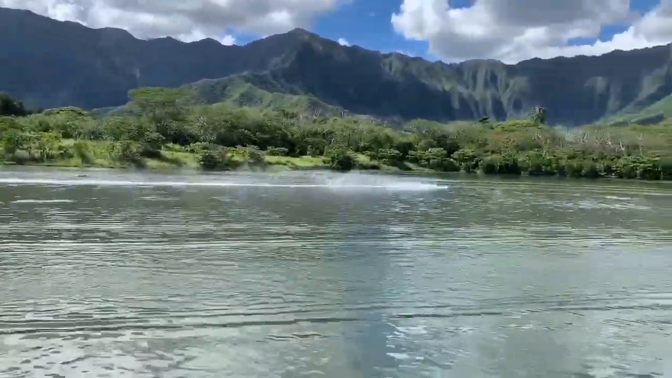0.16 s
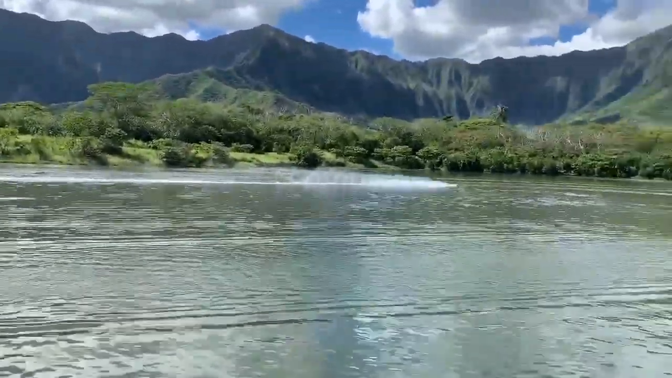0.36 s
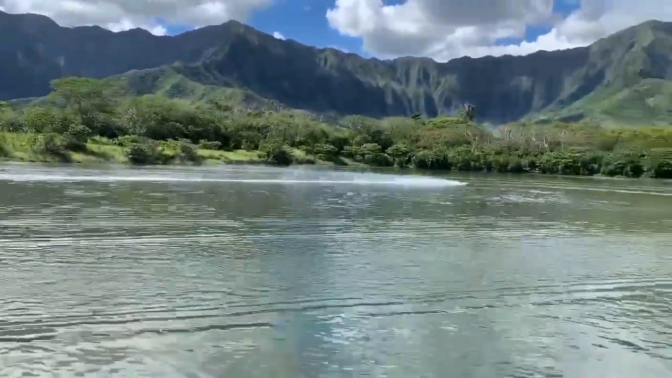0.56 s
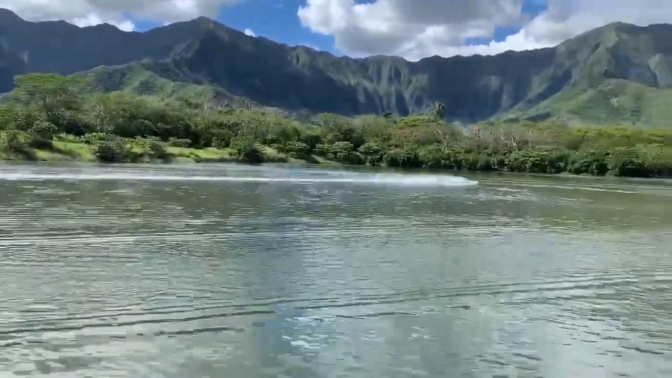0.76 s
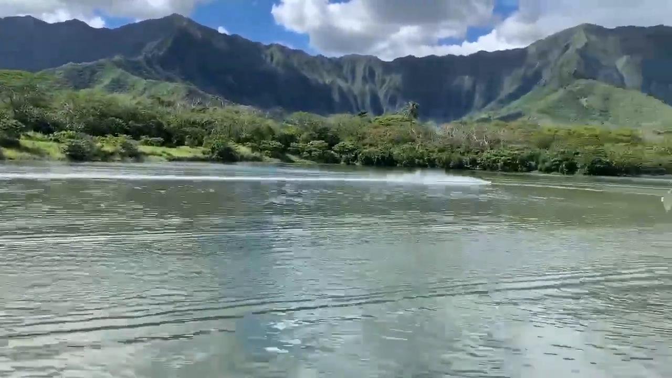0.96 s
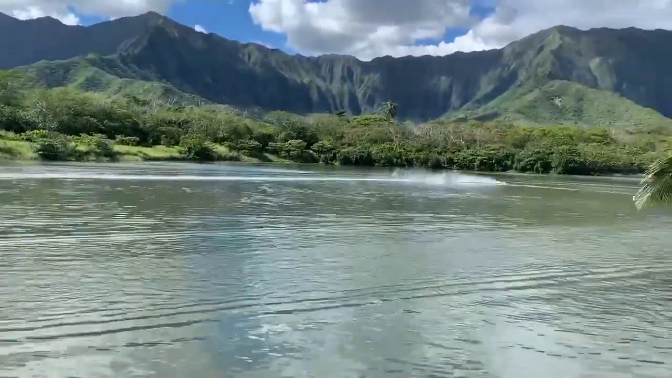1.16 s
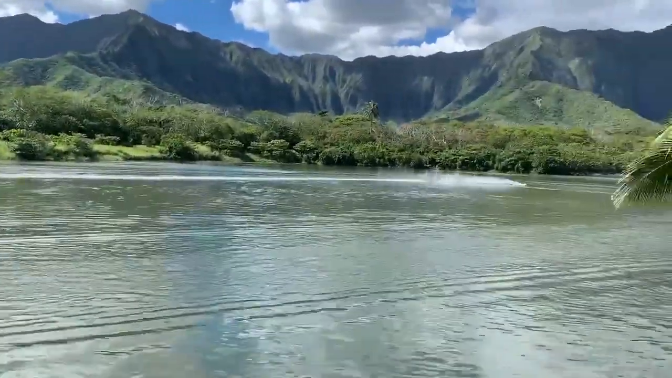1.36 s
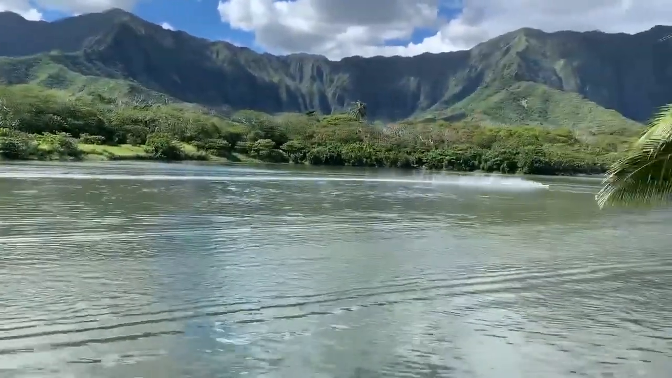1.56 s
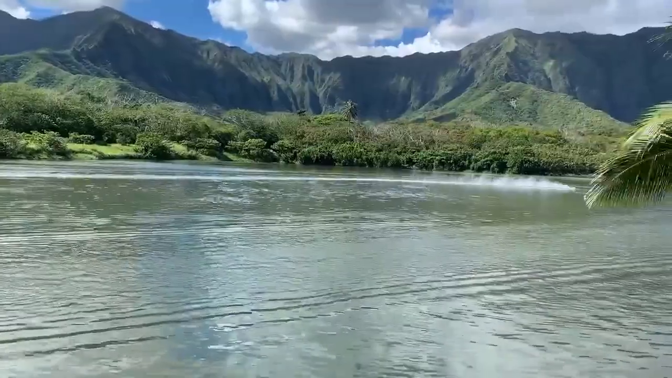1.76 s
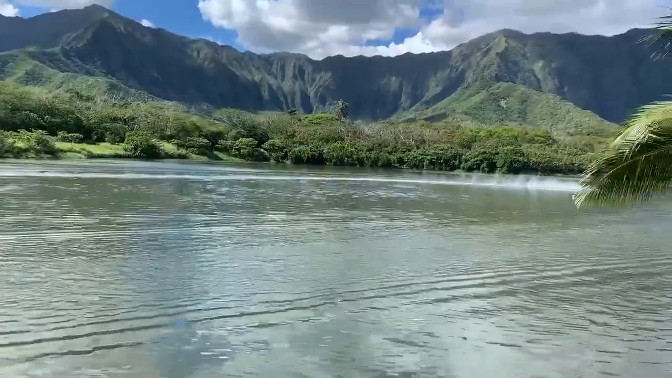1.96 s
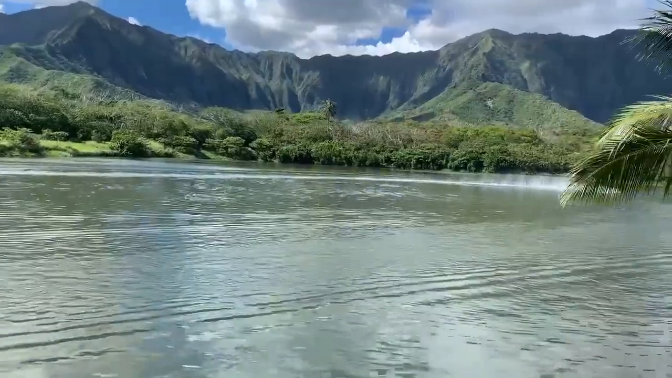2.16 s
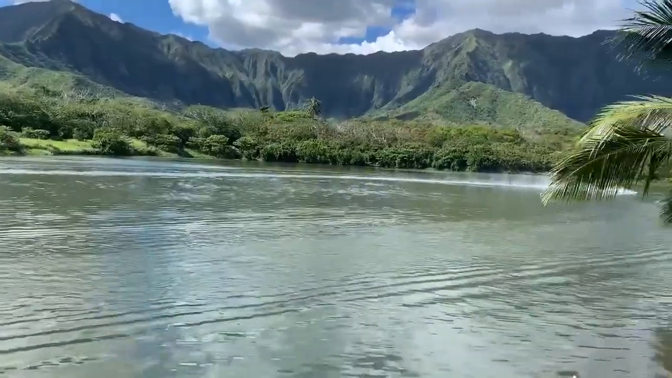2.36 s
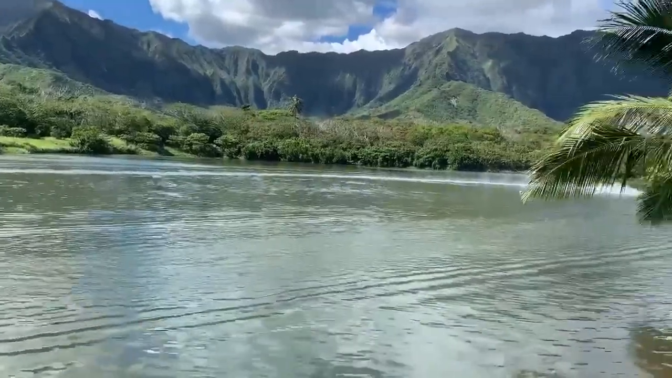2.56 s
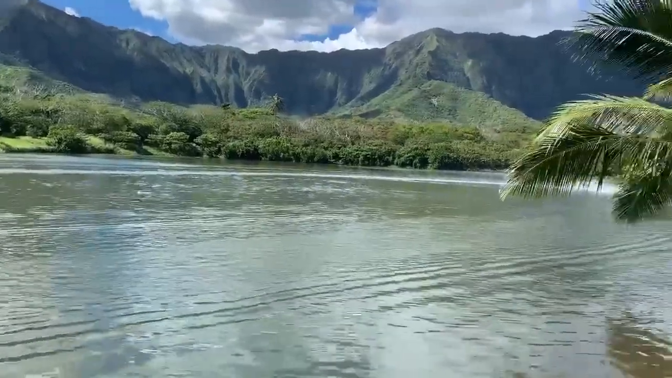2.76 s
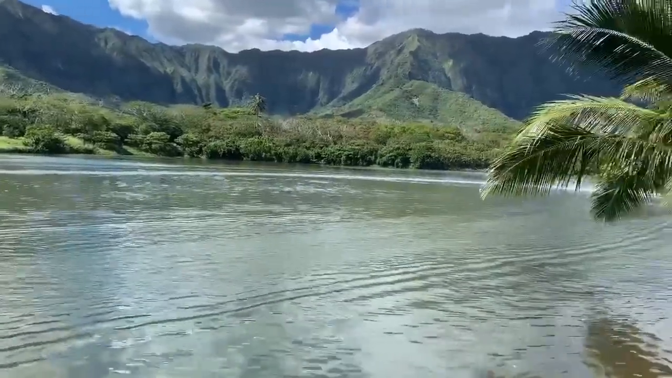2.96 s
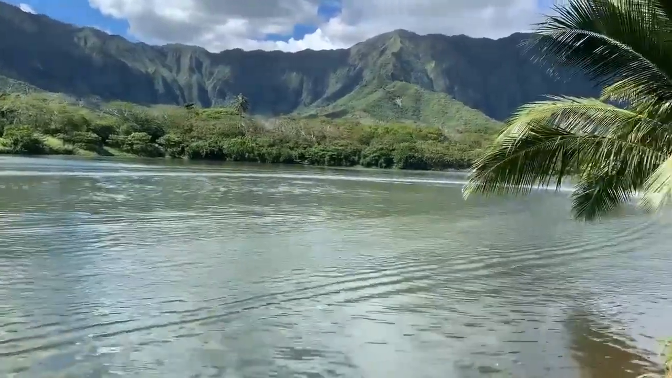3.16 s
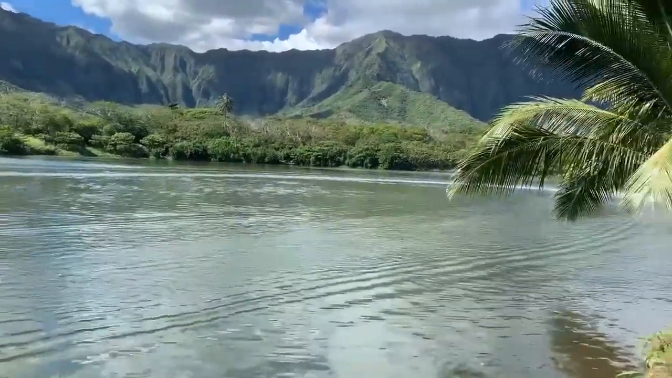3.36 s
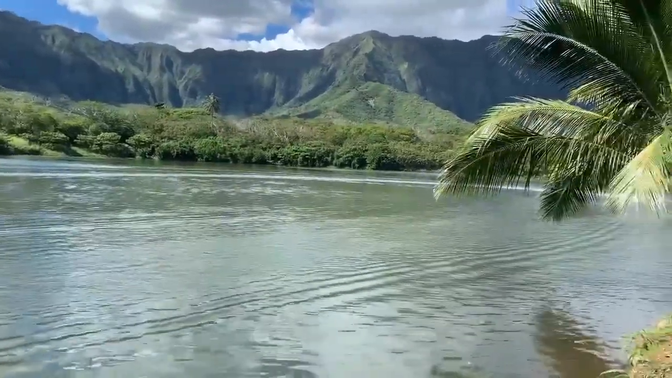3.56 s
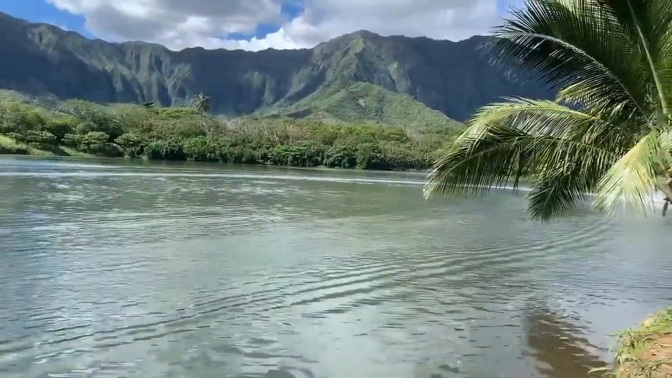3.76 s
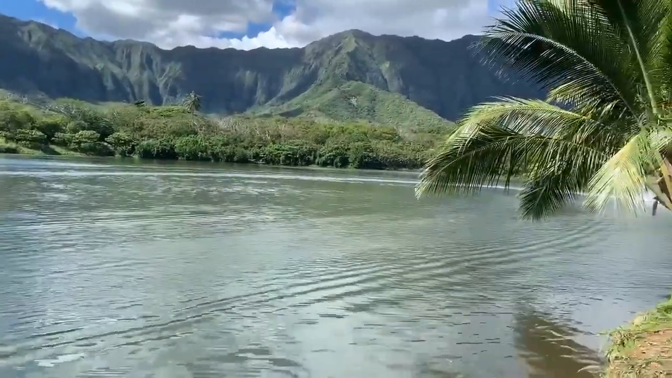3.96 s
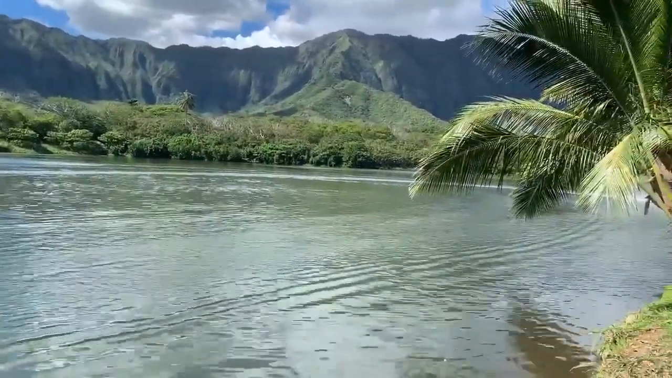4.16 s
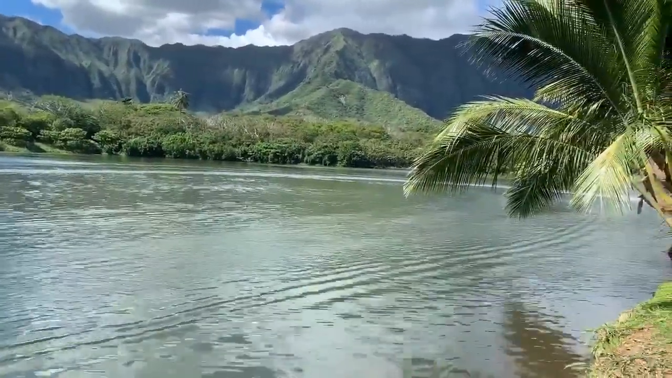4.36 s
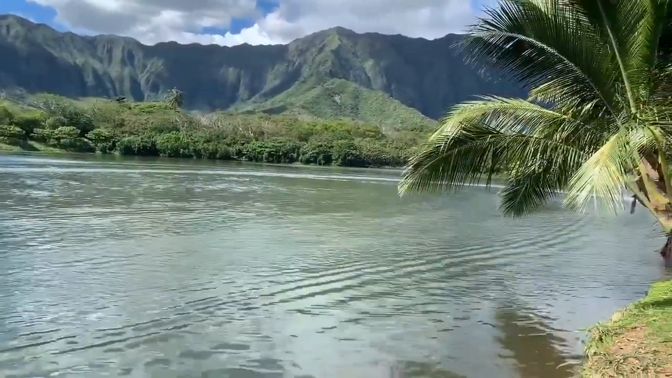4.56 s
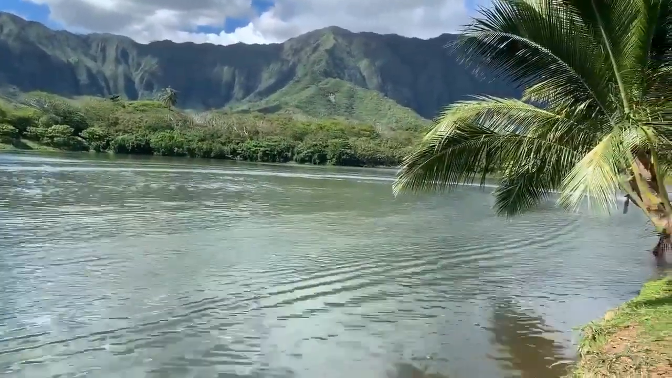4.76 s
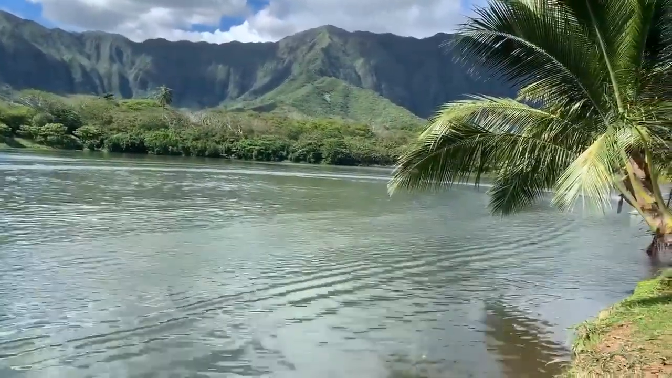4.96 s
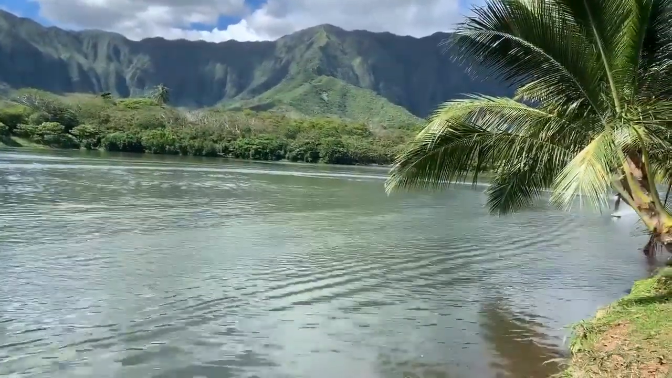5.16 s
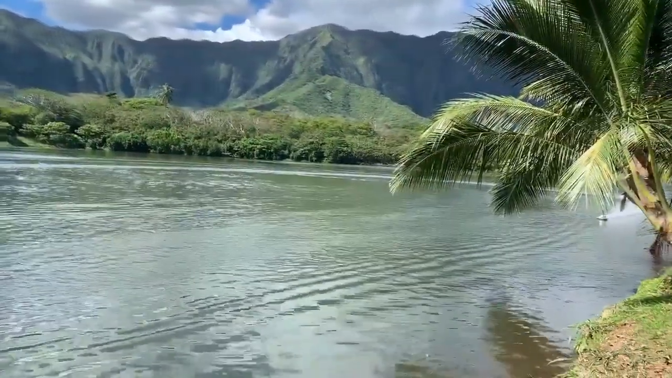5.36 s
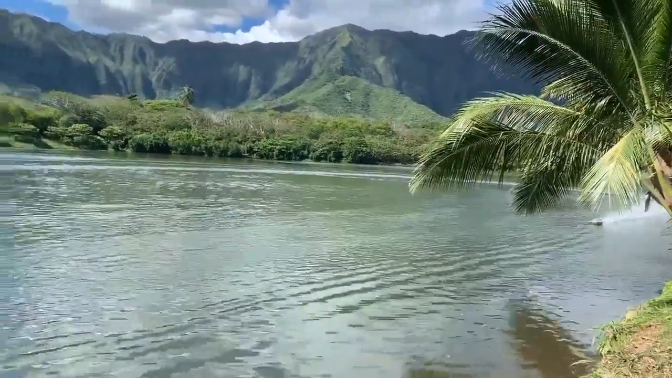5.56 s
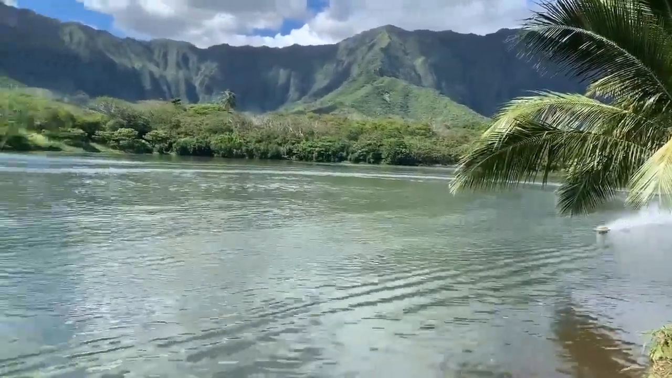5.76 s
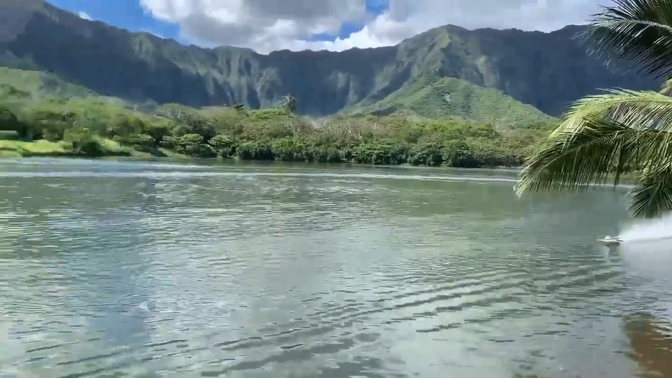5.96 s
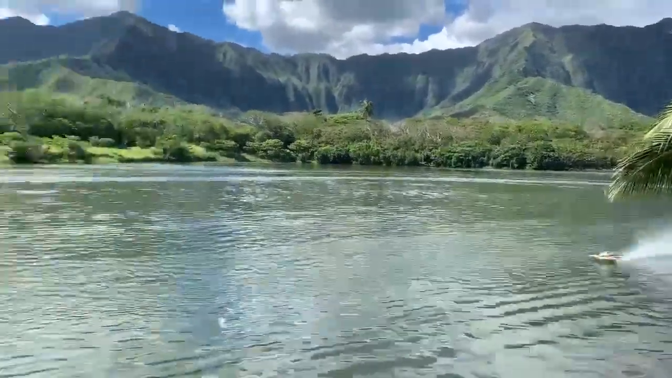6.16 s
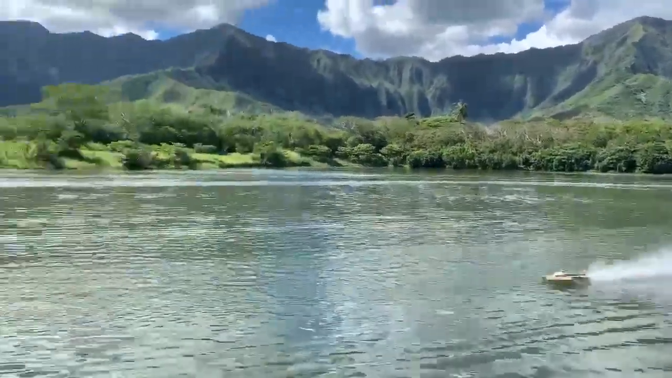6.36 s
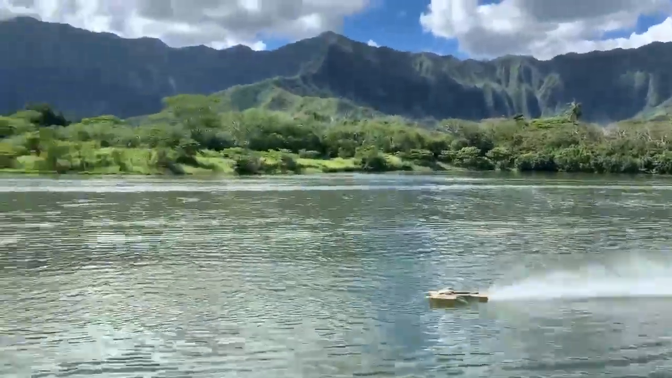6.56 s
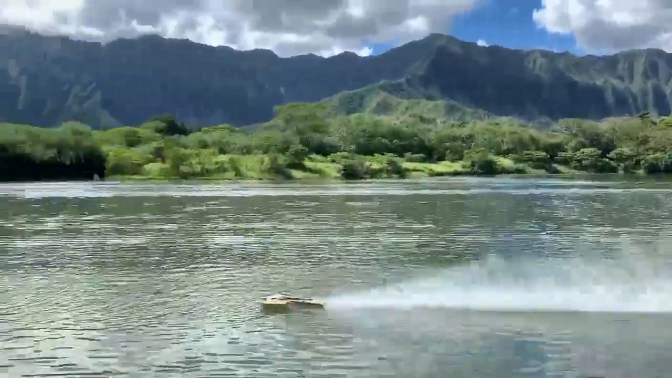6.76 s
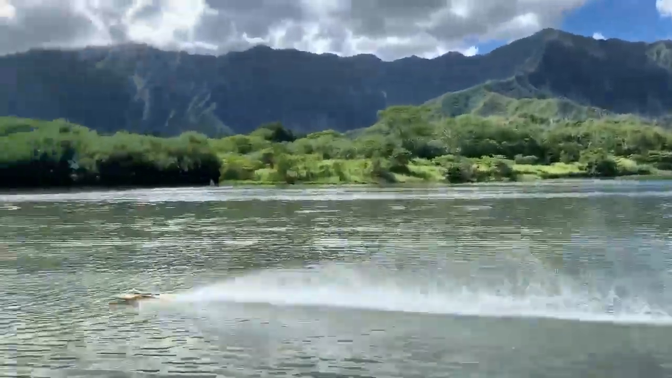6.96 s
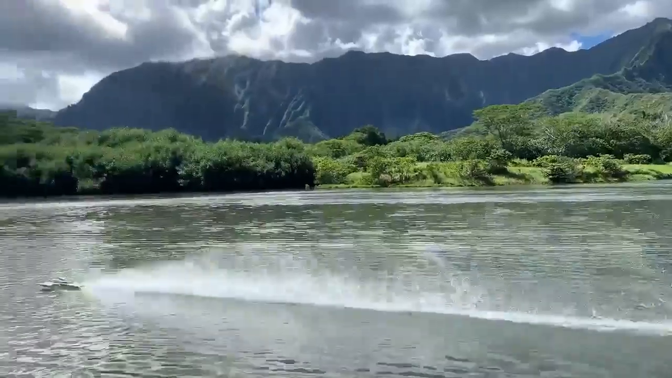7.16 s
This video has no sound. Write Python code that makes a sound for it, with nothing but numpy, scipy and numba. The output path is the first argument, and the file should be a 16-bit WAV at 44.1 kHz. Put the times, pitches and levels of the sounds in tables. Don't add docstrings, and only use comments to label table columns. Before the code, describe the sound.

Open river, heard by a small stereo microphone on the bank. From 0 to 0.8 s a single-cylinder model boat engine buzzes steadily at moderate distance, a nasal high-revving whine around 245 firings a second. At about 0.8 s the pitch steps up and the sound gets fainter and duller as it races away, revs fluttering rapidly with each hop until 2.9 s. The throttle is cut around 3.0 to 3.4 s, pitch falling to a rough burble, recovers, then drops deeper at 3.85 to 4.2 s. It lugs lower near 4.6 s, picks up by 4.9 s and approaches, louder and raspier, racing briefly around 5.4 to 5.75 s. Light hull slaps come at 6.1 to 6.45 s, a harder knock at 6.87 s as it passes close, pitch sinking slightly, with bright hissing spray until the end at 7.3 s. Low wind and diffuse bank echo throughout.

```python
import sys
import numpy as np
from scipy import signal
from scipy.fft import rfft, irfft
from scipy.io import wavfile
from numba import njit

SR = 44100
rng = np.random.default_rng(int(sys.argv[2]) if len(sys.argv) > 2 else 0)


def generate_wav(sig):
    pcm = np.round(np.clip(np.atleast_2d(sig).T, -1, 1) * 32767).astype(np.int16)
    wavfile.write(sys.argv[1], SR, pcm)


def volts(x):
    e = np.asarray(x, float) / 20
    return 10 ** e


N = 321930
HOP = 64
SPLIT_HZ = 3300
PASS_S = 6.866


def columns(rows):
    seconds, *rest = np.transpose(rows)
    return [np.interp(np.arange(0, N + HOP - 1, HOP) / SR, seconds, column) for column in rest]


def at_hz(points, hz):
    return np.interp(np.log(hz), np.log(np.array(points)[:, 0] + 1), np.array(points)[:, 1])


def rms_one(x):
    return x / np.sqrt(np.mean(x ** 2) + 1e-20)


def full(slow):
    return np.interp(np.arange(N) / HOP, np.arange(len(slow)), slow)


def drift(rate, count):
    r = np.exp(-2 * np.pi * rate * HOP / SR)
    chance = rng.standard_normal((count, N // HOP + 602))
    slow = signal.lfilter([1], [1, -2 * r, r * r], chance)[:, 600:]
    return slow / slow.std(axis=1, keepdims=True)


def coloured(spectrum):
    hz = np.arange(N // 2 + 1) * SR / N + 1
    inside = (hz > spectrum[0][0]) * (hz < spectrum[-1][0])
    white = rfft(rng.standard_normal(N))
    return rms_one(irfft(white * volts(at_hz(spectrum, hz)) * inside, N))


# time [s], level [dB].
GUSTS = [(0.0, -48), (0.81, -47), (1.26, -48), (3.68, -45.5), (3.76, -39.5), (4.67, -44), (5.45, -42),
         (5.92, -49), (7.28, -51.5), (7.3, -57)]
# frequency [Hz], level [dB per Hz].
WIND_COLOUR = [(12, -45), (20, -26), (42, 0.5), (59, 4.5), (108, -0.5), (133, -1), (170, -6), (220, -48),
               (370, -120)]


def wind():
    gust_db, = columns(GUSTS)
    lumps_db = 1.5 * drift(3.5, count=1)[0, :len(gust_db)]
    level = full(volts(gust_db + 1.0 + lumps_db))
    high_pass = signal.butter(1, 90, "high", fs=SR, output="sos")
    mid = coloured(WIND_COLOUR)
    side = volts(-12.0) * signal.sosfilt(high_pass, coloured(WIND_COLOUR))
    return level * np.array([mid, side])


def banks(x):
    t60_s, delay_s, echo_db = .6, .04, -18
    t = np.arange(int(1.2 * SR)) / SR
    tail = rng.standard_normal((2, len(t))) * volts(-60 * t / t60_s) * (t > delay_s)
    tail = signal.sosfilt(signal.butter(2, [600, 2600], "band", fs=SR, output="sos"), tail)
    tail = tail / np.sqrt(np.sum(tail ** 2, axis=1, keepdims=True)) * volts([[0.1], [-5]])
    return volts(echo_db) * signal.fftconvolve(x[None], tail, axes=1)[:, :N]


# time [s], share of the full turn, side level [dB].
BEARING = [
    (0, -0.86, -0.5),
    (.75, -1.1, -1.5),
    (1.0, 1.05, -3),
    (1.8, 0.97, 0),
    (2.9, 0.9, 2),
    (4.3, 0.88, 2.5),
    (6.45, 0.8, 2),
    (6.62, -0.95, -3.5),
    (7.3, -0.99, 2),
]
# frequency [Hz], angle [rad].
TURN = [(200, 0.22), (350, 1.6), (700, 1.06), (1400, 1.57), (2800, 1.52), (5600, 1.0), (9000, 1.9)]
# frequency [Hz], side minus mid [dB].
WIDTH = [(60, -2), (250, -13), (700, -11.5), (1400, -5.5), (2500, -4.5), (4000, -1), (6000, -0.5),
         (7400, -0.5), (8300, -7.5), (9500, -4.5), (10500, -9), (11300, 0.5)]
# time [s], lower null [Hz], second null [Hz], its depth [dB].
MOVING_NULLS = [(0, 1650, 3400, 45), (.78, 1770, 3530, 40), (1.0, 1790, 3500, 12), (2.0, 1850, 3550, 15),
                (2.9, 1930, 3500, 15), (4.2, 2030, 3400, 40), (4.5, 2080, 3500, 45), (4.8, 2050, 3650, 45),
                (5.2, 2050, 3430, 45), (5.4, 2050, 3500, 30), (5.55, 2030, 3500, 12), (5.9, 2030, 3450, 35),
                (6.3, 2000, 3480, 40), (6.5, 1900, 3250, 15), (6.8, 1850, 3150, 18), (7.0, 1750, 3000, 35),
                (7.3, 1644, 3000, 25)]
# frequency [Hz], width [Hz], depth [dB].
STEADY_NULLS = [(4910, 200, 4.5), (7347, 647, 12), (11360, 675, 42)]


def ports(x, patchy_db, scatter):
    hz, s, frames = signal.stft(x, SR, nperseg=1024, noverlap=768)
    hz, at = hz[:, None] + 1, np.minimum((s * SR / HOP).astype(int), N // HOP)
    turn, side_db = [c[at] for c in columns(BEARING)]
    first_hz, second_hz, second_db = [c[at] for c in columns(MOVING_NULLS)]
    null_db = 22 * np.exp(-((hz - first_hz) / 110) ** 2)
    second_db = second_db * np.exp(-((hz - second_hz) / 125) ** 4)
    for centre_hz, width_hz, depth_db in STEADY_NULLS:
        null_db = null_db + depth_db * np.exp(-((hz - centre_hz) / width_hz) ** 2)

    band = (hz[:, 0] / 250).astype(int)
    blotch, sway, flicker, dropout = [drift(rate, count=90)[band][:, at] for rate in (14, 7, 8, 3.5)]
    frames = frames * volts(patchy_db * blotch * np.clip(hz / 4000, 0, 1))
    octaves = np.log2(np.clip(hz, 3300, 9500) / 6000)
    frames = frames * volts(16 * np.clip(s - PASS_S, 0, 1) * octaves)

    lapse = np.clip(2 * (dropout - .9), 0, 1) * (hz > 2800) * (hz < 8000)
    mid = frames * volts(-null_db * np.clip(0.71 + 0.5 * flicker, 0, 1.5) - second_db - 30 * lapse)
    swing = np.pi + turn * at_hz(TURN, hz) + scatter * np.minimum(hz / 3000, 2) * sway
    bounce_db = 0.14 * (null_db + second_db) * (hz < 5600)
    side = frames * volts(at_hz(WIDTH, hz) + side_db - bounce_db) * np.exp(1j * swing)
    return signal.istft(np.array([mid, side]), SR, nperseg=1024, noverlap=768)[1][:, :N]


# time [s], peak level [dB], pitch [Hz].
SLAPS = [
    (6.09, -23, 330),
    (6.2, -21, 334),
    (6.371, -25, 365),
    (6.447, -19.5, 326),
    (6.867, -14.5, 718),
]


def slaps():
    t = np.arange(N) / SR
    out = np.zeros(N)
    for s, db, hz in SLAPS:
        age = np.clip(t - s + 0.00464, 0, 1)
        knock = np.e * age / 0.004 * np.exp(-age / 0.0032)
        out += volts(db) * knock * np.sin(2 * np.pi * hz * age)
    return out


# frequency [Hz], level [dB per Hz].
WASH = [(88, -75), (150, -19.5), (262, -7.5), (361, -15), (780, -11.5), (1400, -10), (1560, -10.5),
        (1800, -11.5), (2580, -13), (3600, -16), (4680, -25), (7920, -120)]
# frequency [Hz], level [dB per Hz].
RASP = [(1940, -43), (3300, -19), (3500, 0), (4090, 0.5), (4910, -0.5), (6020, -1.5), (7610, 0),
        (9000, -0.5), (10400, -2.5), (11500, -3.5), (15000, -55), (22000, -120)]
# frequency [Hz], level [dB per Hz].
SPRAY = [(1940, -64), (3300, -6), (4090, 0.5), (4680, 0.5), (5800, 0), (6410, 6), (7420, 4), (8720, 0),
         (9940, -1.5), (11500, -1.5), (15000, -53), (22000, -120)]


def turbulence(angle, bark_db, rasp_db, aspect, noise, hiss, gate_depth, wash_db):
    puff = rms_one(np.exp(gate_depth * np.cos(angle - .4)))
    near = full(np.clip(aspect - 7, 0, 1))
    churn_db = 1.5 * drift(25, count=1)[0, :len(noise)]
    low = full(volts(bark_db + wash_db + churn_db) * np.sqrt(noise))
    high = full(volts(rasp_db) * np.sqrt(hiss)) * puff
    bright = np.sqrt(1 - near) * coloured(RASP) + np.sqrt(near) * coloured(SPRAY)
    return low * coloured(WASH) + high * bright


# time [s], revs lost [Hz], half length [s].
LANDINGS = [(.91, 11, .05), (1.035, 24, .07), (1.2, 13, .03), (1.34, 17, .08), (1.495, 13, .07),
            (1.62, 18, .03), (1.75, 11, .03), (1.815, 15, .03), (1.885, 28, .04), (1.985, 19, .04),
            (2.1, 15, .07), (2.195, 11, .02), (2.24, 20, .025), (2.31, 25, .035), (2.395, 9, .03),
            (2.46, 22, .035), (2.535, 18, .04), (2.64, 20, .04), (2.7, 11, .03), (2.757, 19, .03),
            (2.86, 27, .04), (2.945, 14, .03), (3.53, 21, .045), (3.612, 27, .045), (3.72, 10, .05),
            (3.805, 20, .035)]
# time [s], revs gained [Hz], half length [s].
SKIPS = [(.06, 4, .08), (.37, 4, .05), (1.17, 8, .03), (2.34, 9, .03), (2.8, 10, .03), (3.77, 12, .03),
         (5.24, 3, .08), (5.43, 11, .06), (5.67, 11, .045), (5.755, 12, .05), (6.32, 2, .05)]


def bumps(rows):
    t = np.arange(0, N + HOP - 1, HOP) / SR
    return sum(hz * np.clip(1 - abs(t - s) / half, 0, 1) for s, hz, half in rows)


# time [s], firing rate [Hz].
REVS = [(0, 244), (0.45, 246), (0.77, 252.6), (0.85, 270), (1.45, 266), (1.9, 274), (2.9, 274), (3.8, 268),
        (4.29, 256), (4.41, 220), (4.57, 199.5), (4.74, 211), (4.92, 250), (5.04, 228), (5.98, 232),
        (6.49, 241.5), (6.6, 236), (7.3, 229)]
# time [s], share of full revs, loss of effort [dB].
CUTS = [
    [(2.96, 1, 0), (2.99, .87, 4), (3.03, .65, 13), (3.09, .51, 9), (3.15, .44, 14), (3.25, .48, 9),
     (3.33, .63, 7), (3.41, .725, 5), (3.47, 1, 0)],
    [(3.84, 1, 0), (3.86, .93, 5), (3.94, .56, 12), (4.01, .36, 17), (4.09, .41, 11), (4.13, .55, 6),
     (4.2, .83, 3), (4.27, 1, 0)],
]
# time [s], level [dB].
LOUDNESS = [(0, -25), (.3, -25), (.45, -27.5), (.8, -30.5), (1.1, -34), (1.45, -32), (3.5, -31), (4.3, -28),
            (4.6, -28.5), (4.76, -26), (4.9, -23), (5.1, -23.5), (5.55, -18), (5.9, -21), (6.25, -19),
            (6.93, -19.5), (7.04, -18.5), (7.26, -18)]
TONE_BY_ASPECT = [-33.5, -26.5, -28, -29, -30, -32.5, -32.5, -30, -25.5, -26.5]
RASP_BY_ASPECT = [-31.5, -44, -40.5, -42.5, -43, -45, -48.5, -45.5, -39.5, -43.5]
FLUTTER_DB = [
    [1.83],
    [1.29],
    [2],
]


def engine(aspect):
    share, loss_db = np.transpose([columns(cut) for cut in CUTS], (1, 0, 2))
    share, loss_db = share.prod(axis=0), loss_db.sum(axis=0)
    bite, skip = bumps(LANDINGS), bumps(SKIPS)
    revs, = columns(REVS)
    middle_db = -28.5
    swing_db = columns(LOUDNESS)[0] - middle_db
    past_s = np.clip(np.arange(len(bite)) * HOP / SR - PASS_S, 0, 1)

    tone_db = np.interp(aspect, range(10), TONE_BY_ASPECT) + 0.46 * swing_db - 40 * (1 - share)
    tone_db = tone_db - .36 * bite + 0.1 * skip - 9 * past_s - 0.26 * np.clip(234 - revs, 0, 99)
    bark_db = middle_db + swing_db - 0.93 * loss_db + 0.1473 * bite - 0.06 * skip
    rasp_db = np.interp(aspect, range(10), RASP_BY_ASPECT) + 1.63 * swing_db - 1.23 * loss_db
    rasp_db = rasp_db + 0.1068 * bite - 0.14 * skip - 3 * past_s

    flutter_db = FLUTTER_DB * drift(11.6, count=3)[:, :len(bite)]
    return (revs - bite + skip) * share, loss_db, np.array([tone_db, bark_db, rasp_db]) + flutter_db


def firing_angle(rate_hz, wobble):
    uneven = 1 + wobble * drift(40, count=1)[0, :len(rate_hz)]
    return np.cumsum(full(rate_hz * uneven)) * 2 * np.pi / SR


# multiple of the firing rate, level [dB].
BROADSIDE = [(1, 0), (2, -50), (3, -36.5), (4, -31), (5, 8), (6, -11), (7, -1), (8, 3), (9, 8), (10, -3),
             (11, -5), (12, -5), (13, -25), (14, -36)]
LEAVING = [(1, -15), (2, -7.5), (3, 7.5), (4, -6.5), (5, -8), (6, 0.5), (7, -9), (8, -11), (9, -50),
           (10, -6.5), (11, -13), (12, -26), (13, -6.5), (14, -33)]
TURNING = [(1, 9.5), (2, -7.5), (3, -2.5), (4, -2), (5, 3), (6, 0.5), (7, -2), (8, -7), (9, -20),
           (10, -3.5), (11, -17.5), (12, -23), (13, -14), (14, -36)]
LUGGING = [(1, 14), (2, -12), (3, -3), (4, -19), (5, -0.5), (6, -5), (7, -8), (8, 1.5), (9, -17), (10, -7),
           (11, -6), (12, -9), (13, -10), (14, -12)]
HEAD_ON = [(1, -8), (2, -12.5), (3, -10.5), (4, -5.5), (5, 1), (6, -23), (7, -8), (8, -18.5), (9, -25),
           (10, -15.5), (11, -11.5), (12, -12.5), (13, -12), (14, -15.5)]
RACING = [(1, -5), (2, -17), (3, -9), (4, -6), (5, -2.5), (6, -13), (7, 2.5), (8, -10), (9, -22),
          (10, -8.5), (11, -12.5), (12, -3), (13, -10.5), (14, -13)]
CLOSING = [(1, -1), (2, -12), (3, -0.5), (4, -0.5), (5, -9), (6, -7), (7, -4), (8, -12), (9, -18),
           (10, -12), (11, -18), (12, -8), (13, -6), (14, -17)]
NEARING = [(1, -1), (2, -13.5), (3, -11.5), (4, -11.5), (5, -4.5), (6, -7.5), (7, -0.5), (8, -18), (9, -16),
           (10, -5), (11, -15.5), (12, -5.5), (13, -9), (14, -14)]
PASSING = [(1, 0), (2, -9.5), (3, -9), (4, -10), (5, -3), (6, -5.5), (7, -4), (8, -12), (9, -9.5), (10, -9),
           (11, -25.5), (12, -23.5), (13, -24), (14, -27)]
GONE = [(1, 0), (2, -13.5), (3, -3.5), (4, -13.5), (5, -3.5), (6, -2.5), (7, -1), (8, -1.5), (9, -13),
        (10, -20), (11, 0), (12, -7), (13, -19), (14, -14)]


def pipe_colour(multiple, aspect):
    colours = [BROADSIDE, LEAVING, TURNING, LUGGING, HEAD_ON, RACING, CLOSING, NEARING, PASSING, GONE]
    out = 0
    for k, colour in enumerate(colours):
        out = out + np.clip(1 - abs(aspect - k), 0, 1) * np.interp(multiple, *np.transpose(colour))
    return out


@njit
def harmonics(angle, height, hop):
    out = np.zeros(len(angle))
    for i in range(len(angle)):
        j, part, step = i // hop, i % hop / hop, np.exp(1j * angle[i])
        spin = step
        for k in range(height.shape[1]):
            out[i] += ((height[j, k] * (1 - part) + height[j + 1, k] * part) * spin).real
            spin *= step
    return out


def exhaust(angle, rate_hz, tone_db, bark_db, rasp_db, aspect, noise, hiss, shimmer_db, wander):
    k = np.arange(1, 61)[:, None]
    hz, size, near = k * rate_hz, len(rate_hz), np.clip(aspect - 7, 0, 1)
    shimmer = volts(shimmer_db * (1 + 11 * noise) * drift(13, count=60)[:, :size])

    idle_db = 7 * np.clip((225 - rate_hz) / 60, 0, 1) * np.exp(-np.log(hz / 330) ** 2 / .6)
    pipe_db = pipe_colour(k * np.minimum(rate_hz / 213, 1), aspect)
    bark = shimmer * volts(pipe_db + idle_db) * (hz < SPLIT_HZ) * (k > 1)
    bright_db = (1.5 - near) * at_hz(RASP, hz) + near * at_hz(SPRAY, hz)
    rasp = shimmer * volts(bright_db) * (hz >= SPLIT_HZ) * (hz < 11600)

    height = (k == 1) * volts(tone_db) * np.sqrt(2)
    for part, level_db, noise_share in (bark, bark_db, noise), (rasp, rasp_db, hiss):
        power = np.sum(part ** 2 * (hz > 550), axis=0) + 1e-9
        height = height + part * volts(level_db) * np.sqrt(2 * (1 - noise_share) / power)

    phase = wander * (1 + 3 * noise) * np.sqrt(hz / 1000) * drift(8, count=60)[:, :size]
    roll = 1.2 * np.clip(1.7 - k / 25, .3, 1) * drift(1.5, count=60)[:, :size]
    phase = phase + .22 * k ** 1.5 + roll
    height = np.pad(height * np.exp(1j * phase), [(0, 0), (0, 1)], "edge")
    return harmonics(angle, height.T.copy(), HOP)


# time [s], aspect [0 broadside, 1 leaving, 2 turning, 3 lugging, 4 head-on,
# 5 racing, 6 closing, 7 nearing, 8 passing, 9 gone], noise share of the bark [0-1].
COURSE = [(0, 0.57, 0.1), (.75, 0.58, 0.22), (.9, 1.35, 0.2), (1.8, 1.9, 0.37), (2.9, 0.83, 0.45),
          (3.05, 1.83, 0.15), (3.5, 2.15, 0.3), (3.83, 2.44, 0.26), (4.02, 1.5, 0.02), (4.3, 3.8, 0.19),
          (4.62, 2.8, 0.12), (4.9, 3.84, 0.1), (5.2, 3.93, 0.11), (5.55, 4.62, 0.1), (5.8, 4.87, 0.12),
          (6.0, 5.88, 0.17), (6.4, 7.1, 0.21), (6.75, 7.8, 0.2), (7.1, 8.44, 0.19), (7.3, 8.98, 0.17)]


def scene():
    aspect, noise = columns(COURSE)
    rate_hz, loss_db, (tone_db, bark_db, rasp_db) = engine(aspect)
    noise = np.clip(noise + .035 * loss_db, .01, .95)
    hiss = np.clip(.01 + 1.5 * noise, .01, .9)
    angle = firing_angle(rate_hz, wobble=.0008 + .11 * np.minimum(noise, .5) ** 2)
    boat = exhaust(angle, rate_hz, tone_db, bark_db, rasp_db + 1.5, aspect, noise, hiss,
                   shimmer_db=1.0, wander=.19)
    boat = boat + turbulence(angle, bark_db, rasp_db - 4, aspect, noise, hiss, gate_depth=.6, wash_db=-1.5)
    boat = boat + slaps()
    echo = banks(boat)
    mid, side = ports(boat + echo[0], patchy_db=2.5, scatter=0.81) + echo * [[0], [1]] + wind()
    fade = np.clip((N - np.arange(N)) / SR / 0.066 + 0.7, 0, 1)
    return fade * np.array([mid + side, mid - side])


def low_pass(x):
    return signal.sosfilt(signal.butter(12, 11670, fs=SR, output="sos"), x)


def record(dry):
    mix = 1.4 * np.tanh(dry / 1.4)
    return low_pass(mix)


dry = scene()
out = record(dry)
generate_wav(out)
```